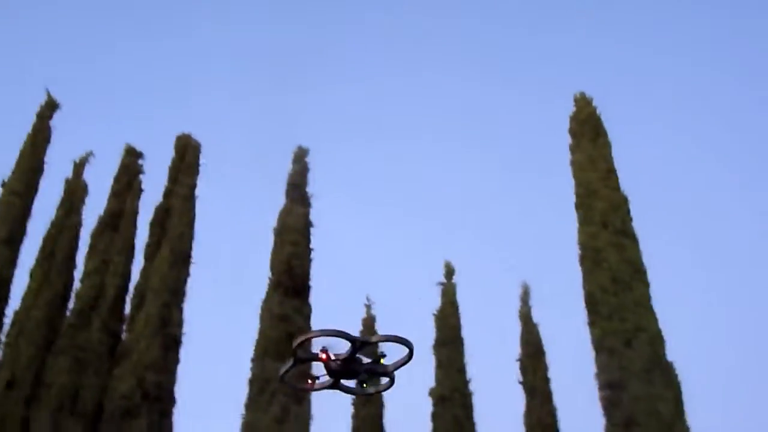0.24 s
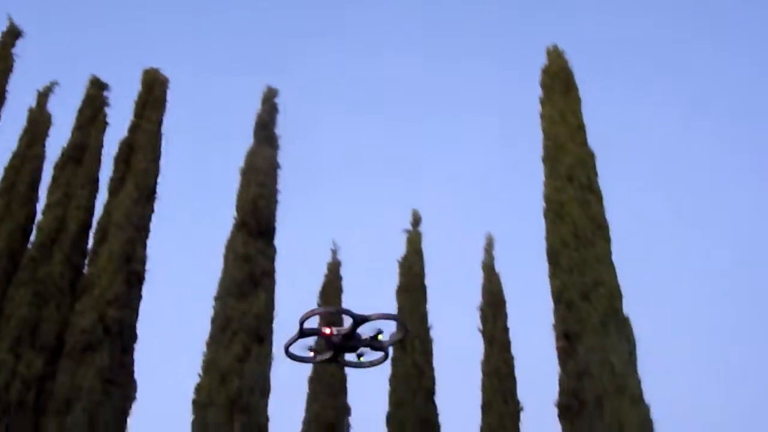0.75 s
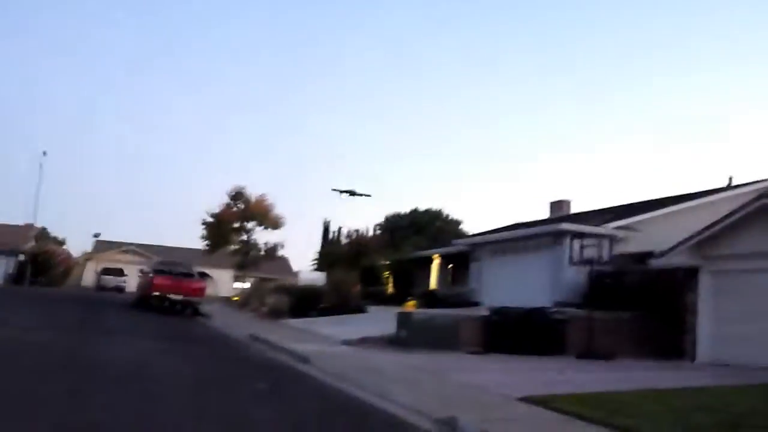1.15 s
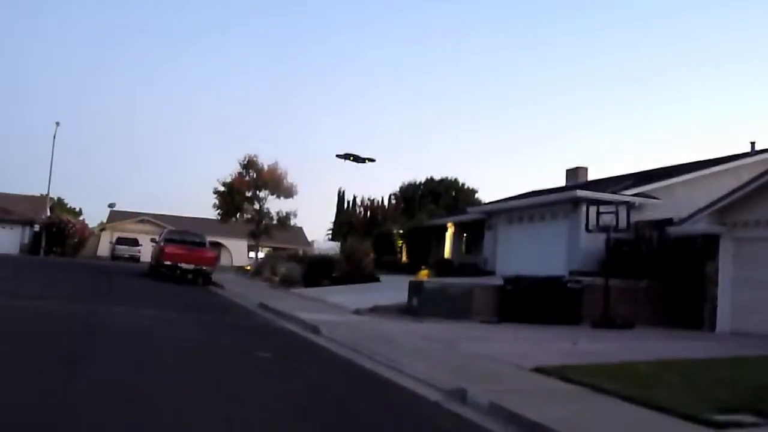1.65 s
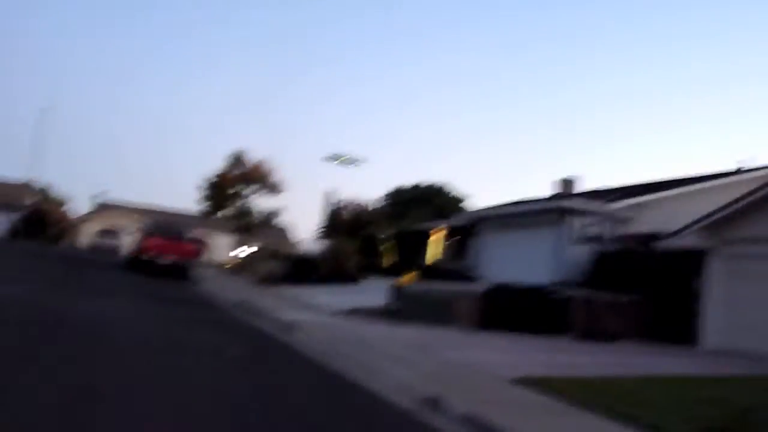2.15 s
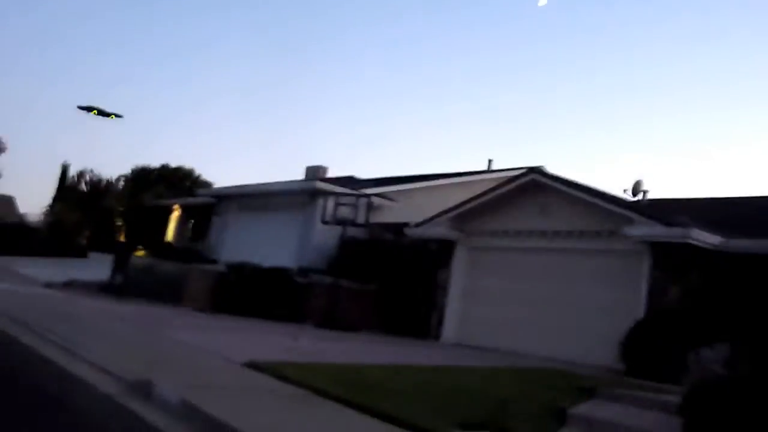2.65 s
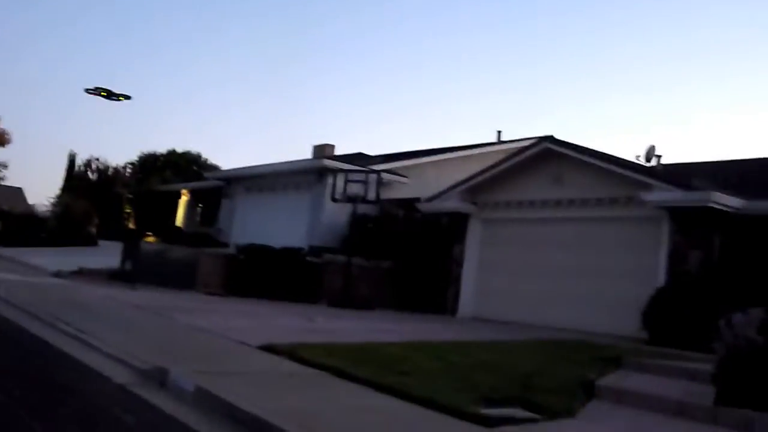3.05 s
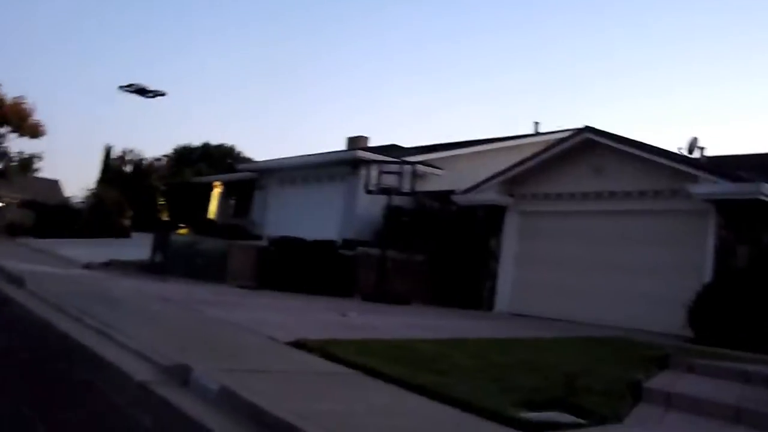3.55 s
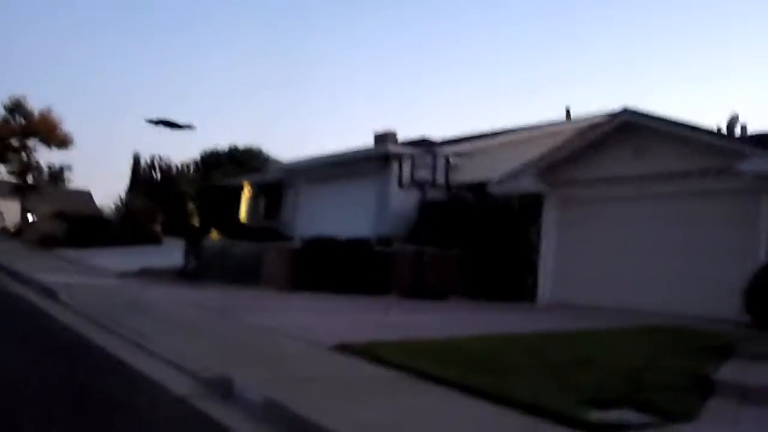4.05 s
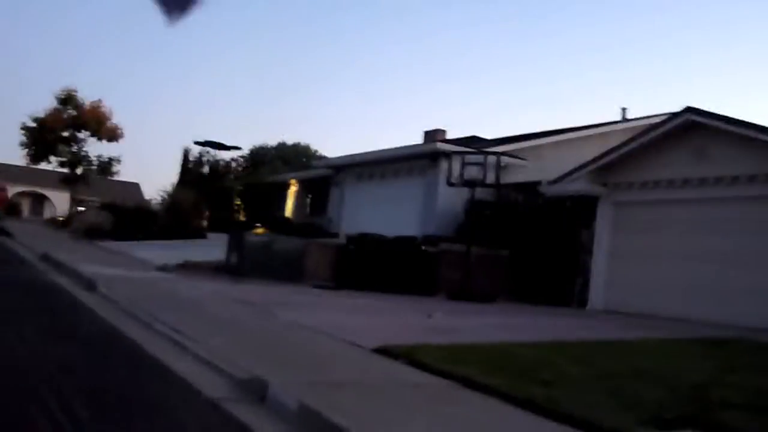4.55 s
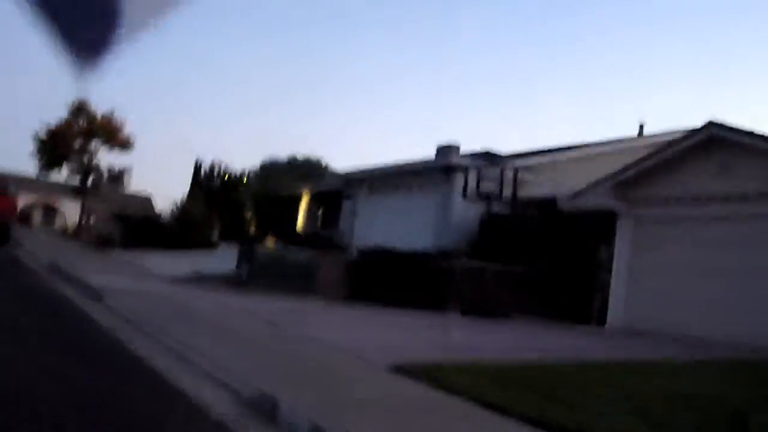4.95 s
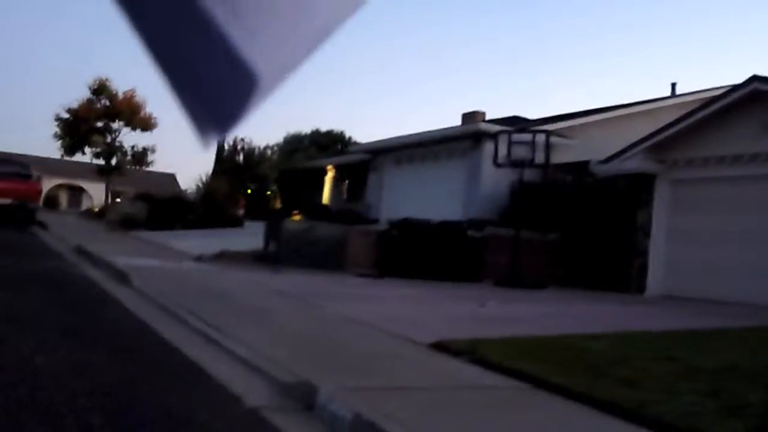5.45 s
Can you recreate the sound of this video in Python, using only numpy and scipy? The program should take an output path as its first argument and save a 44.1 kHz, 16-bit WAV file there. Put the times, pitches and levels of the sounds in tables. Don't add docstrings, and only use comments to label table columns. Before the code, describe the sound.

A toy drone's whirring hiss close by cuts out; afterwards a thin far whine, low engine idle, finger taps and two hard knocks.

```python
import sys
import numpy as np
from scipy import signal
from scipy.io import wavfile
from scipy.ndimage import uniform_filter1d, map_coordinates

SR = 44100
rng = np.random.default_rng(int(sys.argv[2]) if len(sys.argv) > 2 else 0)


def dump(signal):
    limited = np.clip(np.atleast_2d(signal).T, -1, 1)
    pcm = np.round(limited * 32767).astype(np.int16)
    wavfile.write(sys.argv[1], SR, pcm)


def decibels_to_gain(level_db):
    exponent = np.asarray(level_db, float) / 20
    return 10 ** exponent


N = 250929
TIME = np.arange(N) / SR

SHOT_S = 1.3
FADE_S, SILENT_S, RESUME_S = 0.89, 1.0195, 1.5485

# t/s, level about shot mean/dB, extra off-axis side treble/dB
FLIGHT = [(0, 2.5, -16), (.12, 3, -6), (.3, 2.5, -7), (.5, 1.5, -10), (.66, 0, -7), (.9, 0.5, -5),
          (1.56, -1, -9), (1.75, 0, -7), (2.28, 0, -8), (2.37, 1, 1), (2.7, 1, 1), (2.95, 1.5, 2),
          (3.35, 2.5, 0), (3.5, 1.5, -1), (4.4, 2, -2), (4.9, 1, -1), (5.25, 1, -6), (5.69, 0.3, -4)]
# f/Hz, share
FOLLOW = [(600, 0.1), (4000, 0.36), (9000, 1.04), (13500, 1.4)]
# f/Hz, density/dB per Hz
MID_NEAR_SPECTRUM = [(30, -89), (60, -76), (250, -78.5), (500, -77), (1000, -76.5), (2000, -80),
                     (3300, -82), (5300, -84.5), (6000, -86.5), (7500, -80), (9600, -75), (10200, -83),
                     (14000, -85), (15700, -90)]
SIDE_NEAR_SPECTRUM = [(200, -97), (700, -100.5), (1500, -100), (2400, -100), (3600, -84.5), (5200, -94),
                      (6800, -90.5), (8300, -88.5), (9500, -93.5), (11800, -88), (13000, -87),
                      (15500, -100)]
MID_FAR_SPECTRUM = [(30, -113), (60, -84.5), (300, -76), (600, -72.5), (900, -79.5), (2200, -87),
                    (3300, -87.5), (6000, -90.5), (7500, -91.5), (8700, -85), (10200, -93), (13000, -91),
                    (15000, -95), (15800, -100)]
SIDE_FAR_SPECTRUM = [(200, -99.5), (1000, -94.5), (2200, -97), (3600, -87), (5200, -94), (7000, -99),
                     (8700, -86.5), (10500, -94), (12200, -87), (14000, -91.5), (15500, -94)]
SHAFT_NEAR_HZ = [61.5, 60.1, 64.14, 61.9]
SHAFT_FAR_HZ = [58.73, 60.04, 61.8, 58.32]
# f/Hz, level/dB
MOTOR_SPECTRUM = [(2500, -58.5), (4000, -65), (7000, -66.5), (9000, -60), (11000, -68.5), (14500, -59.5)]
# t/s, delay/ms, share
BODY = [(0, 1.33, 0.2), (1.05, 1.42, 0.2), (1.55, 1.4, 0.14), (2.5, 2.1, 0.22), (3.501, 1.7, 0.057),
        (4.0, 1.8, 0.18), (4.6, 1.75, 0.18), (5.69, 1.16, 0.13)]
THRUM_NEAR_DB = [-64, -68.5, -71, -68, -58, -59, -57, -53.5, -64, -54, -63, -69, -60.5, -65, -59, -61]
THRUM_FAR_DB = [-75, -65, -66, -62, -83, -77, -84.5, -62.5, -67, -71.5, -88, -109, -112, -97, -76.5, -69]
# t/s, f/Hz, level/dB
LEAD = [(0, 8400, -46), (.06, 8160, -44.5), (.23, 8400, -40.5), (.3, 8270, -44), (.55, 8450, -46.5),
        (.7, 8360, -48), (.9, 8320, -46), (1.03, 8150, -45)]
# start f/Hz, drift/Hz per s, start level/dB, sag/dB per s
OTHERS = [(8800, 200.5, -47.5, -40), (8500, 279.5, -52.5, -11), (9600, -200, -55, -9.5)]
# t/s, f/Hz, level/dB
LEFT_ROTOR = [(1.7, 3680, -61), (2.1, 3700, -58.5), (2.55, 3830, -71), (3.1, 3530, -68), (3.4, 3560, -77),
              (3.46, 3520, -55), (3.75, 3590, -59.5), (4.05, 3510, -66), (4.25, 3480, -64),
              (4.5, 3580, -61), (4.75, 3580, -64), (4.85, 3460, -63), (5.05, 3450, -74), (5.5, 3750, -75)]
AHEAD_ROTOR = [(1.58, 4220, -56.5), (1.8, 4360, -61), (2.3, 4320, -65), (2.5, 4406, -61), (2.68, 4410, -58),
               (2.82, 4240, -55), (3.0, 4250, -59), (3.35, 4230, -64), (3.6, 4310, -81), (4.3, 4356, -63),
               (4.65, 4550, -78), (5.15, 4410, -57), (5.3, 4230, -67), (5.5, 4350, -55.5),
               (5.69, 4330, -60)]
SLOW_ROTOR = [(4.4, 3000, -60), (4.85, 3090, -57)]
# f/Hz, level/dB
FAR_WHINES = [(9680, -67), (9040, -68), (8200, -67.5)]
# f/Hz, relative density/dB
WIND_SPECTRUM = [(25, -20.5), (45, 0.5), (90, 2), (140, -1.5), (220, -7), (400, -36)]
# t/s, level/dB
GUSTS = [(0, -52), (.25, -53), (.4, -39.5), (.53, -48), (.8, -46), (1.0, -31.5), (1.56, -38), (1.73, -33),
         (1.9, -37), (2.0, -49), (2.27, -44), (2.4, -46), (2.95, -48.5), (3.3, -45.5), (4.1, -46),
         (4.8, -48.5), (5.3, -47.5), (5.69, -44.5)]
# t/s, peak level/dB, ring f/Hz
THUMPS = [
    (0.402, -35.5, 118),
    (0.656, -35, 80.2),
    (.882, -33.5, 75.8),
    (1.846, -26.5, 128),
]
# t/s, firing f/Hz, level/dB
IDLE = [(1.55, 90, -65), (2.3, 90, -48), (3.0, 88.5, -52), (3.6, 82.6, -53), (4.2, 84.7, -55),
        (5.69, 84.9, -69)]
# t/s, peak level/dB, ring f/Hz,
# crack/dB, left minus right/dB
TAPS = [(1.929, -19, 350, -20, 1.5), (1.971, -38, 1500, -14, -12), (2.0285, -17.5, 510, -26, -3),
        (2.0155, -26, 10200, -6, 0), (2.039, -23, 377, -6, 0), (2.0393, -24, 3400, -20, -4),
        (2.106, -28.5, 1510, 5, -11), (2.349, -35, 1670, -20, 10), (2.415, -35.5, 1900, -20, 9),
        (2.478, -28, 1630, -26.5, 1), (2.724, -34.5, 1480, -10, -7), (3.051, -31, 3700, -4, 12),
        (3.1045, -23, 1100, 6, 2), (3.209, -36, 1365, -1, 3), (3.9934, -23, 520, -9, 0),
        (4.113, -23, 1310, -1, 1), (5.0701, -23, 12800, -10, 2),
        (5.0704, -24, 9000, -10, 2) , (5.0785, -33, 9500, 2, 2), (5.131, -26, 450, -1, -2),
        (5.2249, -24, 450, -8, 0), (5.439, -30, 540, 0, -1), (5.476, -36, 1110, -12, 6)]
# t/s, peak level/dB, build-up/s, rattle/dB, left minus right/dB
KNOCKS = [
    (2.053, -9, 0.0035, -7.5, 2.5),
    (5.0719, -5, 0.00097, -5, 7),
]
# f/Hz, level/dB, t60/s
CASE_MODES = [
    [(450, -7.5, 0.35), (670, -7, 0.017), (1005, 7, 0.022), (1270, -7.5, 0.091), (1640, 1.5, 0.0065),
     (1900, -7, 0.036), (3100, 5.5, 0.0038), (5800, -28, 0.0087), (11040, 0, 0.01)],
    [(653, -2.5, 0.033), (900, -31, .02), (1177, 4, 0.033), (1380, -7.5, 0.07), (1730, -1, 0.039),
     (2240, 4.5, 0.022), (3000, -3, 0.03), (3680, 6, 0.015), (4000, -5, 0.02), (5480, -16, 0.012),
     (8800, -29, .01), (12600, -29, 0.0087)],
]
# t/s, length/s, level/dB, centre f/Hz
RUBS = [
    (2.052, 0.041, -45.5, 1190),
    (2.334, 0.25, -58, 1500),
    (3.079, 0.054, -47.5, 1300),
    (3.148, 0.12, -44, 930),
    (4.103, 0.22, -54, 1500),
    (4.441, 0.079, -48.5, 800),
    (5.466, 0.17, -49.5, 980),
]
# f/Hz, width/Hz
NOTCHES = [(2609, 640), (2670, 110), (4556, 420), (4630, 260), (8000, 200), (7890, 90)]


def walk(rate_hz):
    hold = int(SR / rate_hz)
    steps = np.repeat(rng.standard_normal(N // hold + 1), hold)
    return 1.3 * uniform_filter1d(uniform_filter1d(steps, hold), hold)[:N]


def phase(hz):
    return 2 * np.pi * np.cumsum(hz) / SR


def along(table, column, s):
    table = np.array(table)
    return np.interp(s, table[:, 0], table[:, column])


def colour(table, hz):
    f, db = np.transpose(table)
    return np.interp(np.log(np.maximum(hz, 1)), np.log(f), db)


def patchy(white, db_of, patchy_db, bins, frames):
    hz, s, z = signal.stft(white, SR, nperseg=1024, noverlap=896)
    field = uniform_filter1d(rng.standard_normal(z.shape), int(bins), axis=0)
    field = uniform_filter1d(field, int(frames), axis=1)
    gain = decibels_to_gain(db_of(hz[:, None], s) + patchy_db * field / field.std())
    return signal.istft(z * gain, SR, nperseg=1024, noverlap=896)[1][:N] * np.sqrt(SR / 2)


def airflow():
    cover_s, cover_length_s, cover_db = 3.37, 0.15, -7
    side_treble_hz, share = 12400, 0.45

    def swell(hz, s):
        since = s - cover_s
        shade = np.clip(since / 0.027, 0, 1) * np.clip(1 - (since / cover_length_s) ** 2, 0, 1)
        return colour(FOLLOW, hz) * (along(FLIGHT, 1, s) + cover_db * shade)

    def mid_db(hz, s):
        shot = np.where(s < SHOT_S, colour(MID_NEAR_SPECTRUM, hz), colour(MID_FAR_SPECTRUM, hz))
        return shot + swell(hz, s)

    def side_db(hz, s):
        shot = np.where(s < SHOT_S, colour(SIDE_NEAR_SPECTRUM, hz), colour(SIDE_FAR_SPECTRUM, hz))
        treble = np.clip(hz / side_treble_hz - 0.9, 0, 0.1) * 10
        return shot + swell(hz, s) + along(FLIGHT, 2, s) * treble

    white, other = rng.standard_normal((2, N))
    mid = patchy(white, mid_db, 1.62, 8.3, 40)
    side = patchy(share * white + np.sqrt(1 - share ** 2) * other, side_db, 1.5, 9, 40)
    chop = 1 + 0.051 * np.sin(phase(SHAFT_NEAR_HZ[0] * (1 + 0.021 * walk(3.7))))
    return chop * np.array([mid + side, mid - side])


def motors():
    motor_ratio = 8.6
    out, near = np.zeros(N), int(SHOT_S * SR)
    for shaft_hz in SHAFT_NEAR_HZ:
        hz = motor_ratio * shaft_hz
        turn = phase(hz * (1 + 0.015 * walk(3) + 0.002 * walk(60)))[:near]
        for k in range(5, 27):
            level_db = colour(MOTOR_SPECTRUM, k * hz) + 3.8 * walk(19)[:near]
            out[:near] += decibels_to_gain(level_db) * np.sin(k * turn)
    return out


def reflect(x):
    treble = signal.sosfilt(signal.butter(2, 2500, "high", fs=SR, output="sos"), x)
    place = np.arange(N) - along(BODY, 1, TIME) * SR / 1000
    late = np.array([map_coordinates(port, [place], order=3) for port in treble])
    return x + np.clip(along(BODY, 2, TIME), 0, 0.9) * late


def thrum():
    out, far, near = 0, TIME > SHOT_S, int(SHOT_S * SR)
    for near_hz, far_hz in zip(SHAFT_NEAR_HZ, SHAFT_FAR_HZ):
        hunt = np.where(far, 0.012, 0.007) * walk(3) + 0.00285 * walk(25.06)
        turn = phase(np.where(far, far_hz, near_hz) * (1 + hunt))
        for k, (near_db, far_db) in enumerate(zip(THRUM_NEAR_DB, THRUM_FAR_DB)):
            level_db = np.where(far, far_db, near_db) + 3.4 * walk(8)
            out = out + decibels_to_gain(level_db) * np.sin((k + 1) * turn + k * k)
        for k in range(17, 37):
            level_db = -64.5 - 0.5 * (k - 10.5) + 4.0 * walk(7.4)[:near]
            out[:near] += decibels_to_gain(level_db) * np.sin(k * turn[:near] + k * k)
    return np.sqrt(2) * out


def machine_tone(track, rough, flutter_db):
    s, hz, db = np.transpose(track)
    turn = phase(np.interp(TIME, s, hz) * (1 + rough * walk(90)))
    sounding = np.clip(np.minimum(TIME - s[0] + 0.024, s[-1] + 0.047 - TIME) / 0.03, 0, 1)
    level = decibels_to_gain(np.interp(TIME, s, db) + flutter_db * walk(40))
    return np.sqrt(2) * sounding * level * np.sin(turn)


def whine():
    span = np.array([0, SILENT_S])
    near = [LEAD]
    for hz, drift, db, sag in OTHERS:
        near.append(np.transpose([span, hz + drift * span, db + sag * span]))
    second_mesh = np.array(AHEAD_ROTOR) * [1, 2, 1] + [0, 0, -7]
    hunting_s = np.linspace(RESUME_S, N / SR, num=12)
    faint = []
    for hz, db in FAR_WHINES:
        drift, swell = rng.standard_normal((2, len(hunting_s)))
        faint.append(np.transpose([hunting_s, hz * (1 + 0.012 * drift), db + 3.8 * swell]))
    ahead = sum(machine_tone(track, 0.0056, 2.36) for track in near + [second_mesh])
    ahead = ahead + sum(machine_tone(track, 0.0095, 1.7) for track in (AHEAD_ROTOR, SLOW_ROTOR))
    left = decibels_to_gain(np.array([[4.0], [-6.0]])) * machine_tone(LEFT_ROTOR, 0.0075, 1.7)
    behind = decibels_to_gain(np.array([[2.5], [-2.5]])) * sum(machine_tone(track, 0.004, 3.0) for track in faint)
    return ahead + left + behind


def wind():
    def buffet():
        return patchy(rng.standard_normal(N), lambda hz, s: colour(WIND_SPECTRUM, hz) + 0 * s, 0.67, 2, 4.1)

    both, left, right = buffet(), buffet(), buffet()
    apart = np.clip(np.interp(TIME, [1.0, 1.6, 2.6, 3.6], [0.88, 0.91, 0.24, 0.096]), 0, 1)
    ports = np.sqrt(1 - apart ** 2) * both + apart * np.array([1.04 * left, 0.97 * right])
    return decibels_to_gain(along(GUSTS, 1, TIME) - 3.0) * ports / both.std()


TOUCH_TIME = np.arange(int(0.3 * SR)) / SR


def add(out, s, sound, peak_db, pan_db):
    i = int(s * SR)
    sound = sound[:N - i] / np.abs(sound).max()
    pan = np.array([[pan_db], [-pan_db]])[:len(out)] / 2
    out[:, i:i + len(sound)] += sound * decibels_to_gain(peak_db + pan)


def crackle():
    band = signal.butter(1, [700, 6000], "band", fs=SR, output="sos")
    return signal.sosfilt(band, rng.standard_normal(len(TOUCH_TIME)))


def soft_hit(hz, t60_s, crack_db):
    t = TOUCH_TIME
    overtone = 0.73 * np.sin(2 * np.pi * 2.46 * hz * t) * np.exp(-t * hz * 1.7)
    onset = 1 - np.exp(-(t * hz * 4.1) ** 2)
    ring = -(np.sin(2 * np.pi * hz * t) + overtone) * onset * decibels_to_gain(-60 * t / max(t60_s, 0.004))
    return ring / np.abs(ring).max() + decibels_to_gain(crack_db) * crackle() * np.exp(-t / 0.0023)


def thumps():
    out = np.zeros((2, N))
    for s, db, hz in THUMPS:
        add(out, s, soft_hit(hz, 4.2 / hz, -40), db, 10)
    return out


def idle():
    return machine_tone(IDLE, 0.037, 2.4)


def taps():
    pad_t60_s, nail_t60_s, tick_t60_s = 0.011, 0.02, 0.0054
    out = np.zeros((2, N))
    for s, db, hz, crack_db, pan_db in TAPS:
        t60_s = tick_t60_s if hz > 3000 else nail_t60_s if hz > 1000 else pad_t60_s
        add(out, s, soft_hit(hz, t60_s, crack_db), db, pan_db)
    return out


def knocks():
    peak_s, snap_db, snap_s = 0.01, -35, 0.00041
    out, late = np.zeros((2, N)), TOUCH_TIME - peak_s
    before, after = np.minimum(late, 0), np.maximum(late, 0)
    for (s, db, rise_s, rattle_db, pan_db), modes in zip(KNOCKS, CASE_MODES):
        start_s, crack = s - peak_s, crackle()
        grow = np.exp(before / rise_s)
        ring = 0
        for hz, mode_db, t60_s in modes:
            envelope = grow ** (hz / 1000) * decibels_to_gain(mode_db - 60 * after / t60_s)
            ring = ring + envelope * np.cos(2 * np.pi * hz * late)
        rattle = 4 * decibels_to_gain(rattle_db) * crack * grow * np.exp(-after / 0.0037)
        add(out, start_s, ring + rattle, db, pan_db)
        snap = np.diff(crack, prepend=0) * grow * np.exp(-after / snap_s)
        add(out, start_s, snap, db + snap_db, pan_db)
        add(out[:1], start_s, np.roll(rattle, 9), db - 16.5, 0)
    return out


def rubs():
    out = np.zeros((2, N))
    for s, length_s, db, hz in RUBS:
        shared, left, right, level = rng.standard_normal((4, int(length_s * SR)))
        grain = (shared + 0.2 * np.array([left, right])) * decibels_to_gain(5.0 * level) * np.hanning(len(level))
        band = signal.butter(1, [hz / 2, hz * 2], "band", fs=SR, output="sos")
        grain = signal.sosfilt(band, grain)
        i = int(s * SR)
        out[:, i:i + len(level)] += grain * decibels_to_gain(db) / grain.std()
    return out


def scene():
    craft = reflect(airflow() + motors()) + thrum() + whine()
    return craft + wind() + thumps() + idle() + taps() + knocks() + rubs()


def band_limit(x):
    return signal.sosfilt(signal.butter(12, 16150, fs=SR, output="sos"), x)


def record(dry):
    limit, near_gain_db, fade_bend = decibels_to_gain(-6), 2.5, 0.56
    notch = [np.concatenate(signal.iirnotch(hz, hz / width, SR)) for hz, width in NOTCHES]
    top = signal.ellip(10, 0.3, 70, 15620, fs=SR, output="sos")
    low = signal.butter(3, 38, "high", fs=SR, output="sos")
    limited = limit * np.tanh(dry / limit)
    fade = np.clip((SILENT_S - TIME) / (SILENT_S - FADE_S), 0, 1) ** fade_bend
    fader = decibels_to_gain(near_gain_db) * fade + (TIME > RESUME_S)
    mix = signal.sosfilt(np.vstack([notch, top, low]), limited) * fader
    return band_limit(mix)


dry = scene()
out = record(dry)
dump(out)
```